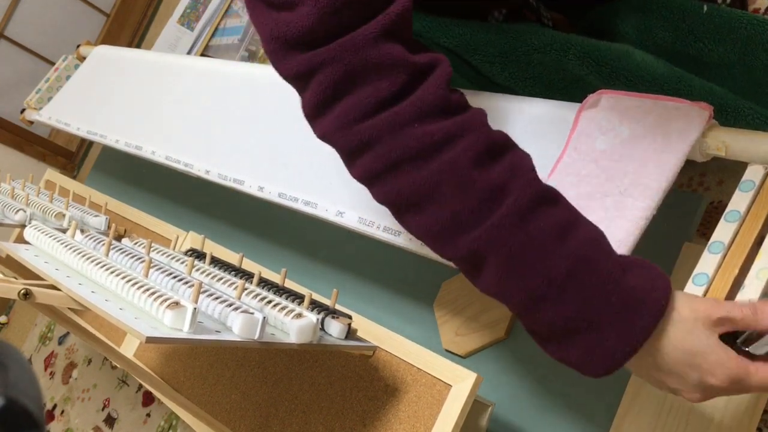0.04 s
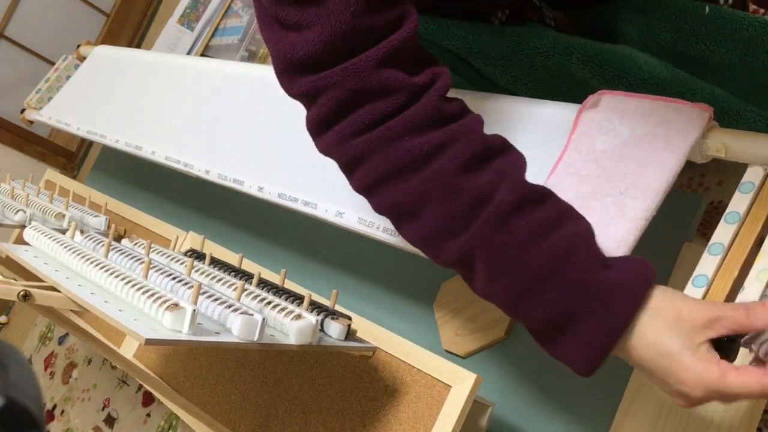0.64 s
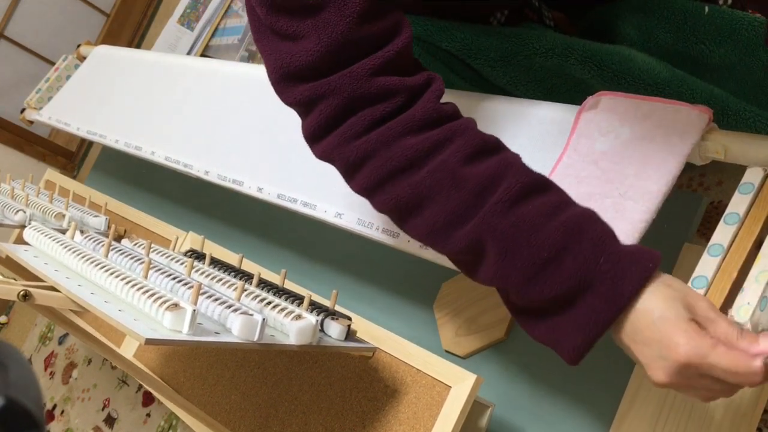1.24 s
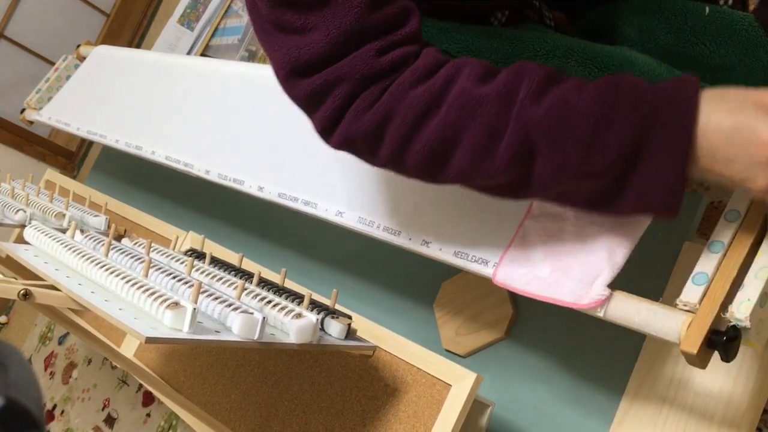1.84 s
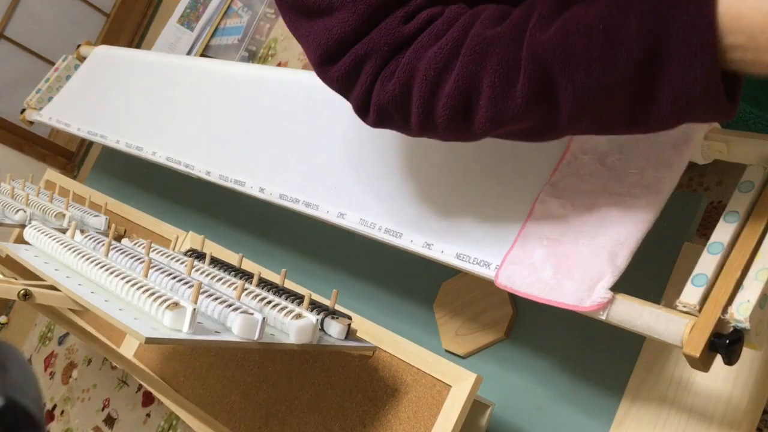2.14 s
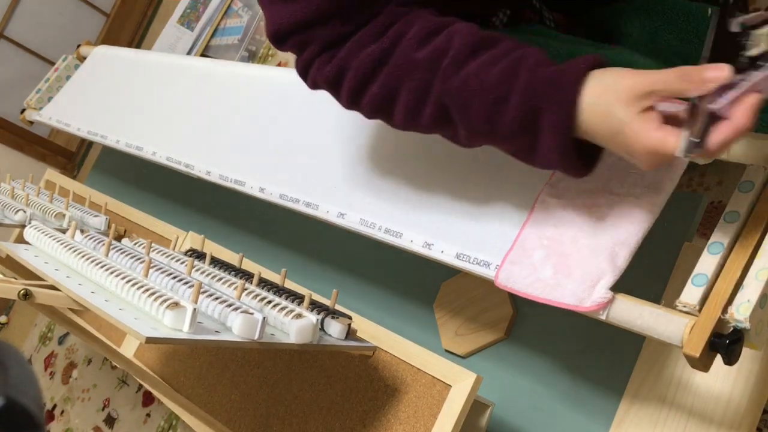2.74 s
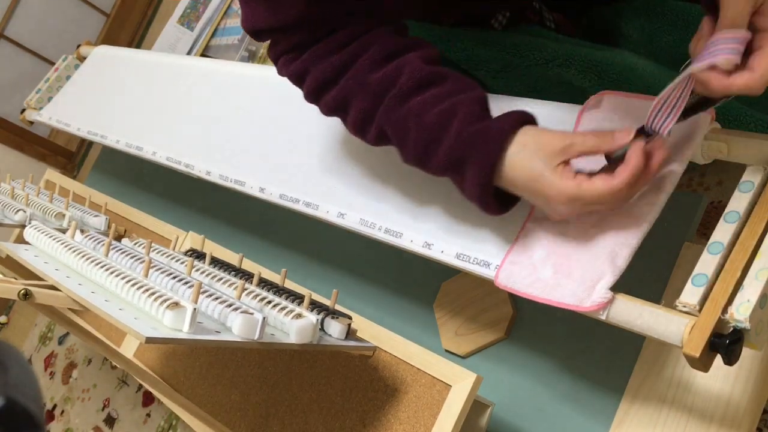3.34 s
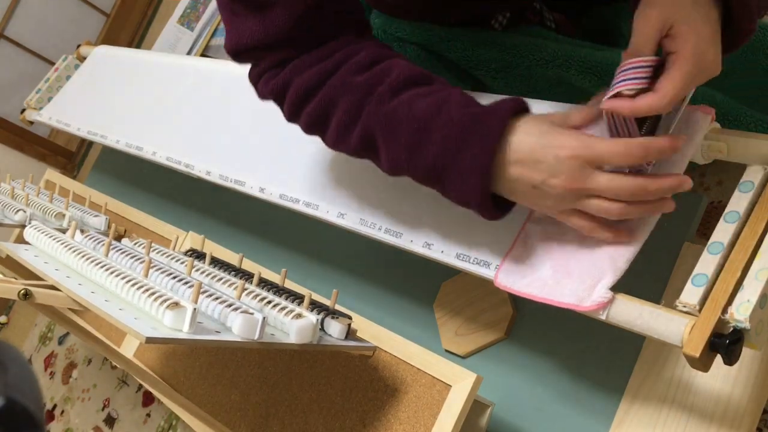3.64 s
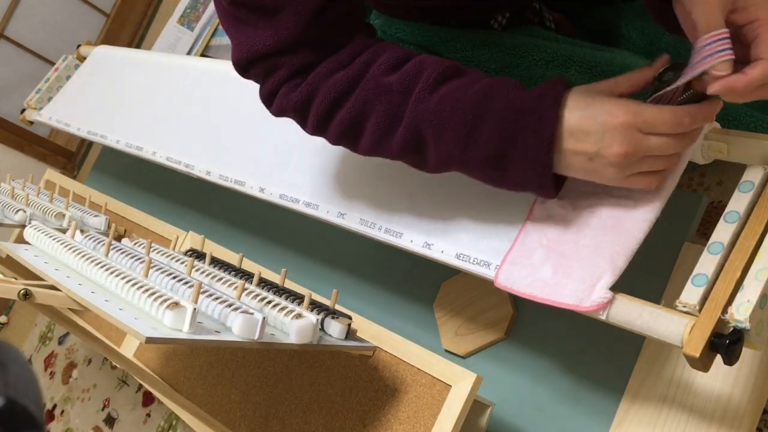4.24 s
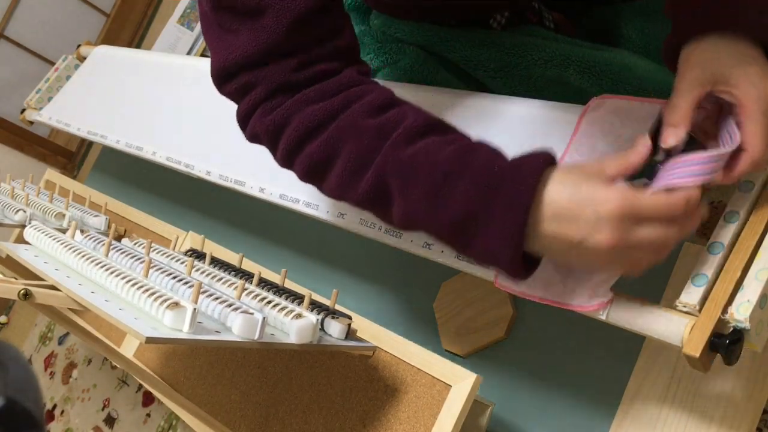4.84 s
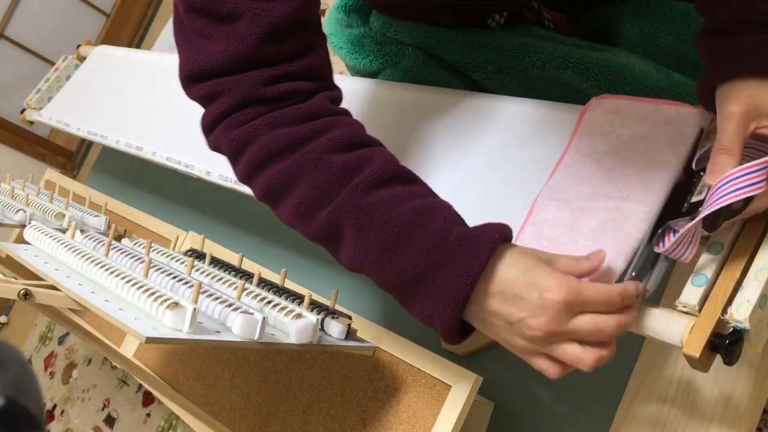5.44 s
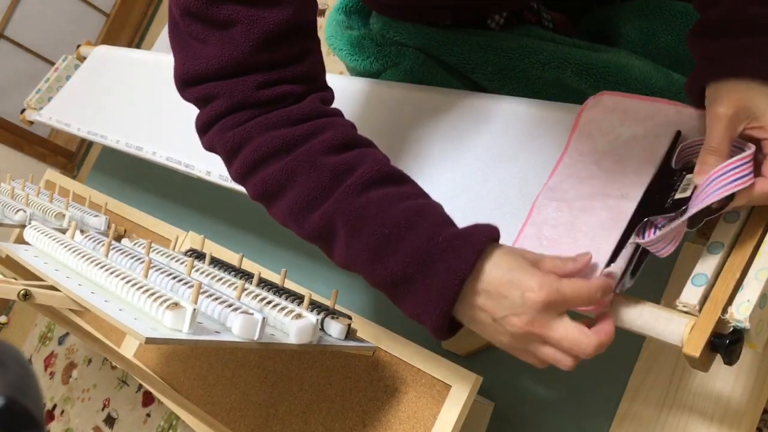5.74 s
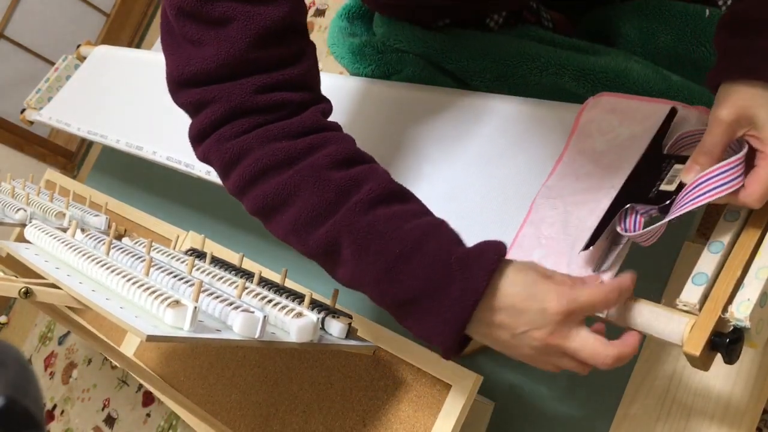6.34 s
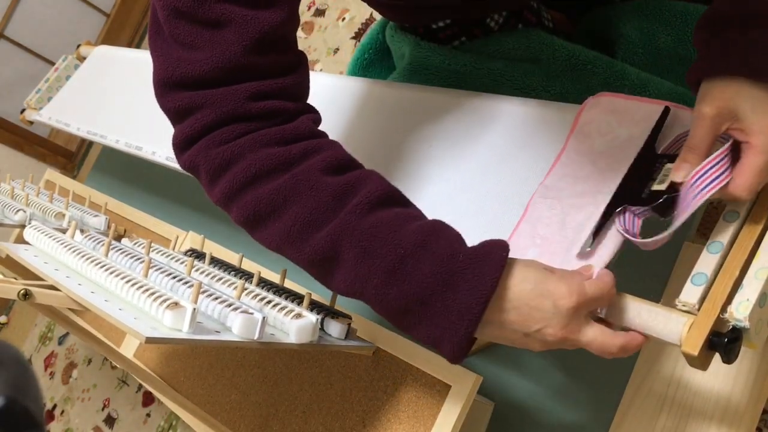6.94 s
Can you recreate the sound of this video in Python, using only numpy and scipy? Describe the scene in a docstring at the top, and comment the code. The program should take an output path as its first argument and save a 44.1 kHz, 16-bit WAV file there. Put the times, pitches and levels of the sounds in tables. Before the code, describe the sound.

Steel binder clips click, squeak and knock on a thudding wooden frame, then tick and scrape in the hands amid rustling sleeves.

```python
"""Binder clips on a wooden frame

A small room, one microphone. Large steel clips are pulled off a frame, handled and fitted on again.
They knock and squeak on the wood, the frame thuds and rumbles, and their wire handles tick and scrape.
Close to the microphone, fleece sleeves and cloth rustle; behind them lie room hiss and a faint hum."""
import sys
import numpy as np
from scipy import signal
from scipy.fft import rfft, irfft, next_fast_len
from scipy.io import wavfile
from scipy.ndimage import uniform_filter1d, map_coordinates

SR = 44100
rng = np.random.default_rng(int(sys.argv[2]) if len(sys.argv) > 2 else 0)


def int16_out(signal):
    """Quantize to a 16-bit WAV file."""
    q = np.round(np.clip(np.atleast_2d(signal).T, -1, 1) * 32767)
    wavfile.write(sys.argv[1], SR, q.astype(np.int16))


N = 317520
AGE = np.arange(SR * 3 // 10) / SR  # seconds since a blow
TOP_HZ = 16200
CONTACT_SPAN_S = 0.02  # a contact's level is set over this opening stretch

# Jolts to the frame; a hard one favours its light parts: start_s, level_db, hardness_db
JOLTS = [(0.001,-49,4.5), (0.29,-48.5,-5), (0.397,-47,-2.5), (0.575,-54.5,-7), (0.885,-70,-14),
         (1.17,-60.5,3.5), (1.346,-56.5,0.5), (1.459,-53.5,-3), (1.521,-66.5,-2), (1.968,-48.5,-9.5),
         (2.008,-49,-12), (5.44,-80,-21.5), (6.08,-68.5,-7), (6.3,-66.5,-8.5), (7.086,-69.5,-12)]
# Modes of a clip's steel spring: pitch_hz, level_db, t60_s
SPRING_MODES = [(1010, -9, 0.29), (1243, 5, 0.053), (1840, -4, 0.28), (2643, -10.5, 0.22), (2860, 1, 0.056),
                (3050, 0, 0.11), (4140, -5.5, 0.086), (4823, -13, 0.2), (5373, -42, 0.22),
                (8850, -15, 0.26), (11600, -10, .17), (11900, -13, 0.18), (14295, -12, 0.21)]
# A contact's four bands (wood, clack, bite, crack): low_hz, high_hz
CONTACT_BANDS = [(300, 900), (900, 1900), (1900, 4200), (4600, 20000)]


def amp(db):
    """Decibels to gain."""
    return 10 ** (np.asarray(db) / 20)


def unit(x):
    """Scale to rms 1."""
    return x / np.sqrt(np.mean(x ** 2) + 1e-20)


def unit_start(x, span_s=CONTACT_SPAN_S):
    """Scale so that the first span_s seconds have rms 1."""
    return x / np.sqrt(np.mean(x[:int(span_s * SR)] ** 2) + 1e-20)


def fade(t, t60):
    """Exponential decay, 60 dB down after t60 seconds."""
    return np.exp(-np.log(1000) * t / np.maximum(t60, 1e-3))


def along(points, hz):
    """Interpolate (Hz, value) points on a log frequency axis."""
    points_hz, values = np.transpose(points)
    return np.interp(np.log(hz + 1), np.log(points_hz + 1), values)


def wobble(rate):
    """A smooth random curve, rate knots a second."""
    knots = rng.standard_normal(int(N * rate / SR) + 4)
    coarse = np.linspace(0, N, num=N // 32)
    return np.interp(np.arange(N), coarse, map_coordinates(knots, [coarse * rate / SR]))


def filtered(x, response):
    """Filter x by a gain that is a function of frequency."""
    size = next_fast_len(len(x) + SR // 4)
    return irfft(rfft(x, size) * response(np.fft.rfftfreq(size, 1 / SR)), size)[:len(x)]


def coloured(x, spectrum):
    """x shaped by (Hz, dB) points, at rms 1."""
    return unit(filtered(x, lambda hz: amp(along(spectrum, hz))))


def add(track, start_s, sound):
    """Mix a sound into the track."""
    start = max(0, round(start_s * SR))
    track[start:start + len(sound)] += sound[:max(0, N - start)]


def ringing(modes, scatter_db, detune=0):
    """Damped modes, struck at new strengths each time; detune is the grip shifting their pitch."""
    hz, db, t60 = np.transpose(modes)[:, :, None]
    strength = amp(db + scatter_db * rng.standard_normal(hz.shape))
    hz = hz * (1 + detune * rng.standard_normal(hz.shape))
    phase = 2 * np.pi * (hz * AGE + rng.random(hz.shape))
    return np.sum(strength * fade(AGE, t60) * np.sin(phase), 0)


def in_room(x, wet_db, build_s=0.0074):
    """The direct sound and the small room's answer, whose treble dies first."""
    # Reverberation time: frequency_hz, t60_s
    room_decay = [(200, 0.32), (1300, 0.4), (3500, 0.25), (9000, 0.22), (15000, 0.12)]
    hz, t, noise = signal.stft(rng.standard_normal(len(AGE)), SR, nperseg=256)
    decaying = noise * fade(t, along(room_decay, hz)[:, None])
    tail = signal.istft(decaying, SR, nperseg=256)[1][:len(AGE)]
    tail *= 1 - np.exp(-(AGE / build_s) ** 2)
    return x + amp(wet_db) * signal.fftconvolve(x, tail / np.linalg.norm(tail))[:len(x)]


def room_tone(hiss_db=-70, hum_db=-73, hum_hz=57.4):
    """The room's steady hiss and a faint mains hum."""
    # Spectrum of the hiss: frequency_hz, density_db
    hiss_spectrum = [(59,-17), (100,-2.5), (224,-6.5), (461,-11.5), (818,-16.5), (2580,-22), (4870,-24),
                     (9020,-22.5), (10500,-25.5), (12500,-19.5), (16000,-20.5)]
    hum = amp(hum_db) * unit(np.sin(2 * np.pi * hum_hz * np.arange(N) / SR))
    return hum + amp(hiss_db) * coloured(rng.standard_normal(N), hiss_spectrum)


def frame_rumble(shudder_db=-2, shudder_t60=0.55, rise_s=0.013):
    """The loose frame rumbles under the arms and shudders on after each jolt."""
    # Rumble from the weight of the arms: time_s, level_db
    leaning = [(0,-57.5), (2.2,-60), (2.4,-64.5), (3.37,-66.5), (3.65,-63.5), (4.25,-70), (4.7,-71.5),
               (5.35,-66.5), (5.73,-68.5), (6.9,-63.5), (7.2,-71)]
    # Spectrum of the rumble: frequency_hz, density_db
    rumble_spectrum = [(15, -61), (25, -33), (30, -4), (40, -10), (65, -0.5), (98, -3.5), (130, -11),
                       (214, -9.5), (253, -16), (349, -17), (418, -26.5), (700, -24.5), (910, -33.5),
                       (1540, -120)]
    power = amp(np.interp(np.arange(N) / SR, *np.transpose(leaning))) ** 2
    shudder = fade(AGE, shudder_t60) * (1 - np.exp(-AGE / rise_s))
    for start_s, level_db, _ in JOLTS:
        add(power, start_s, (amp(level_db + shudder_db) * shudder) ** 2)
    return np.sqrt(power) * coloured(rng.standard_normal(N), rumble_spectrum)


def hand_motion(rustle_floor_db=-76, scrape_floor_db=-83.5, rise_share=0.41, roundness=1.12):
    """Strength of rustle and scrape: strokes speed up and slow; a faint, steady hiss stays between."""
    # Strokes that drag cloth and slide steel: fastest_s, length_s, rustle_db, scrape_db
    strokes = [(0.005,0.22,-54.5,-61.5), (0.178,0.14,-62,-62), (0.337,0.27,-58.5,-58.5),
               (0.585,0.34,-63,-62.5), (0.816,0.22,-70.5,-68.5), (0.944,0.26,-60,-77), (1.078,0.12,-58,-65),
               (1.22,0.45,-57.5,-61.5), (1.435,0.1,-57,-59), (1.512,0.25,-58,-61.5),
               (1.775,0.87,-61.5,-67.5), (1.96,0.2,-55,-56), (2.183,0.23,-71,-62), (2.516,0.17,-67.5,-69.5),
               (2.639,0.12,-63.5,-79), (3.114,0.32,-63.5,-58.5), (3.286,0.17,-64.5,-71.5),
               (3.479,0.15,-66,-70.5), (3.607,0.13,-71,-80), (3.78,0.27,-68.5,-71.5),
               (3.968,0.17,-66.5,-70.5), (4.356,0.27,-71,-76.5), (4.476,0.09,-81,-69),
               (4.763,0.088,-71,-64.5), (5.263,0.11,-76,-88), (5.496,0.19,-70,-71), (5.737,0.21,-69.5,-91),
               (5.912,0.1,-64,-74), (6.023,0.34,-67,-80), (6.342,0.29,-66,-75), (6.557,0.46,-69.5,-87),
               (6.81,0.17,-69.5,-79), (6.877,0.12,-66.5,-79), (7.018,0.43,-68,-83)]
    t = np.arange(N) / SR
    power = np.outer(amp([rustle_floor_db, scrape_floor_db]) ** 2, np.ones(N))
    for fastest_s, length_s, *levels_db in strokes:
        start, end = fastest_s - rise_share * length_s, fastest_s + (1 - rise_share) * length_s
        during = (t > start) & (t < end)
        ramp = np.interp(t[during], [start, fastest_s, end], [0, 1, 0])
        speed = np.sin(np.pi / 2 * ramp) ** roundness
        power[:, during] += np.outer(amp(levels_db), speed) ** 2
    return np.sqrt(power)


def grains(spiky, clumping):
    """Friction: countless tiny catches that come in clumps."""
    catches = rng.standard_normal(N) * np.exp(spiky * rng.standard_normal(N))
    return catches * amp(clumping * (wobble(220) + 2.16 * wobble(35)))


def cloth_rustle(strength, gain_db=0.5):
    """Fibres catch and slip as the sleeves and the strap move close to the microphone."""
    # Spectrum of rubbing cloth: frequency_hz, density_db
    cloth_spectrum = [(120,-26), (260,-9), (450,-22), (900,-1), (1300,-0.5), (1900,-3.5), (2900,-2),
                      (5000,-7.5), (7300,-6.5), (8800,-3.5), (10400,-7), (12500,-1.5), (16000,-9.5)]
    return amp(gain_db) * strength * coloured(grains(spiky=0.64, clumping=0.63), cloth_spectrum)


def handle_scrape(sliding, shift_db=4.0, sharpness=1.8):
    """Rubbing steel stirs the handles' resonances, now one and now another as the contact point moves."""
    # Wire handle resonances, before sharpness narrows them: pitch_hz, width_hz, level_db
    wire_modes = [(1292, 61, -0.5), (1518, 170, -0.5), (1787, 21, 4.5), (1977, 135, -.5), (2398, 81, 4),
                  (2640, 160, 3), (3040, 105, 2.5), (3300, 17, -7), (4195, 290, -8), (7050, 550, -7.5),
                  (8900, 750, -11)]
    slips, sound = grains(spiky=0.67, clumping=-0.5), np.zeros(N)
    for hz, width_hz, db in wire_modes:
        mode = signal.lfilter(*signal.iirpeak(hz, sharpness * hz / width_hz, fs=SR), slips)
        sound += mode * amp(db + shift_db * wobble(28))
    return sliding * unit(sound)


def gripped_steel(peak_db, low_hz=1100, t60=0.031, count=60):
    """Impulse response of steel held in the fingers: many short modes, new with every grip."""
    t = AGE[:len(AGE) // 7]
    place, phase = rng.random((2, count, 1))
    hz = low_hz * (TOP_HZ / low_hz) ** (place ** 0.6)
    modes = np.sum(np.cos(2 * np.pi * (hz * t + phase)), 0) * fade(t, t60)
    unity_peak = 2 * np.log(1000) / (t60 * SR)
    return (t == 0) + amp(peak_db) * unity_peak * modes


def edge_crackle(sliding, gain_db=-6):
    """Sliding edges catch in tiny bright ticks."""
    # Spectrum of the ticks: frequency_hz, gain_db
    tick_spectrum = [(4500, -19), (7200, -20), (9000, 3), (10400, -15), (14000, -13)]
    ticks = signal.fftconvolve(grains(spiky=1.27, clumping=4.0), gripped_steel(peak_db=14))[:N]
    return amp(gain_db) * sliding * coloured(ticks, tick_spectrum)


def frame_thuds(hand_rests_s=2.066, damped_t60=0.3):
    """The jolted frame booms, its heavy parts starting slowest; a hand comes to rest and damps it."""
    # The frame's three families of modes, heavy to light: pitch_hz, level_db, t60_s
    sway = [(53, 3, 0.086), (66.2, -10, 0.37), (78.8, -4, 0.4), (94.3, -8, 0.23)]
    rails = [(122.5, -6.5, 0.22), (140.4, 2.5, 0.32), (177.5, -2.5, 0.3), (199.8, 7, 0.22),
             (221, -3.5, 0.46)]
    panels = [(290, 3, 0.13), (338, 4, 0.21), (371.5, 5.5, 0.19), (437, -10.5, 0.36), (496, -23, 0.34),
              (579, -4, 0.11), (715, -13, 0.24)]
    out = np.zeros(N)
    for start_s, level_db, hardness_db in JOLTS:
        under_hand_s = np.maximum(start_s + AGE - hand_rests_s, 0)
        damping = fade(under_hand_s, damped_t60) if start_s < hand_rests_s else 1
        families = [(sway, -1.5 - hardness_db, 0.025), (rails, 1, 0.008),
                    (panels, -1.5 + hardness_db, 0.003)]
        for modes, share_db, rise_s in families:
            swing = ringing(modes, scatter_db=4) * (1 - np.exp(-AGE / rise_s))
            add(out, start_s, amp(level_db + share_db) * damping * unit_start(swing, span_s=0.09))
    return out


def contact(bands_db, chatter_t60, ring_hz, ring_db, cycles, softness, pitched_db):
    """A fast-dying chatter of tiny impacts in the steel, and the cluster of modes the blow favours."""
    clumps = unit(uniform_filter1d(rng.standard_normal(len(AGE)), size=90))
    impacts = rng.standard_normal(len(AGE)) * amp(2 * clumps)
    attack = 1 - np.exp(-AGE / (softness * chatter_t60 ** 2))  # long, sliding contacts start softly
    chatter = impacts * attack * fade(AGE, chatter_t60)
    burst = signal.fftconvolve(chatter, gripped_steel(pitched_db))[:len(AGE)]
    click = np.zeros(len(AGE))
    for k, edges_hz in enumerate(CONTACT_BANDS):
        band = signal.sosfilt(signal.butter(2, edges_hz, "bandpass", fs=SR, output="sos"), burst)
        click += (-1) ** k * amp(bands_db[k]) * unit_start(band)  # alternate signs join the bands
    t60 = cycles / ring_hz  # high modes die sooner
    cluster = ringing([(ring_hz, 0, t60)], scatter_db=0)
    cluster += ringing([(ring_hz, -10, t60 / 2)] * 2, scatter_db=4, detune=0.063)
    return click + amp(ring_db) * unit_start(attack * cluster)


def spring_ring(level_db):
    """A clip's shaken spring rings in all its modes."""
    return amp(level_db) * unit_start(ringing(SPRING_MODES, scatter_db=1.5))


def clip_knocks(gain_db=-2.5, wood_share=0.67):
    """Steel hits wood and shakes the spring a little; a clip that swings free rings on fully."""
    # Clips hit the frame: start_s, wood_db, steel_db, crack_db, chatter_t60_s, ring_hz
    knocks = [(0.002,-44,-52,-47.5,0.084,2640), (0.285,-54,-56.5,-40.5,0.038,2690),
              (0.392,-43.5,-49.5,-34,0.031,3100), (0.571,-49,-46,-54.5,0.02,1187),
              (1.171,-57,-37.5,-49,0.015,2133), (1.174,-52,-37,-50,0.049,2440),
              (1.347,-48,-56.5,-50.5,.062,1227), (1.46,-58.5,-68,-75,0.12,1080),
              (1.518,-81,-50,-43.5,0.013,3180), (1.951,-63,-50,-46.5,0.085,2550),
              (1.965,-66,-46.5,-57,.008,4680), (1.989,-46.5,-90,-57,0.047,950),
              (2.144,-71,-60,-51.5,0.052,3030), (2.182,-73,-59.5,-51.5,0.044,1860),
              (5.1155,-63,-48,-37,0.0052,5420), (6.785,-68.5,-74,-76,0.13,890),
              (6.829,-75,-68.5,-78,0.011,2640)]
    # A clip comes free: start_s, level_db
    free_swings = [(0.392, -37)]
    out = np.zeros(N)
    for start_s, wood_db, steel_db, crack_db, chatter_t60, ring_hz in knocks:
        clack_db = steel_db + wood_share * (wood_db - steel_db)
        hit = contact([wood_db, clack_db - 1, steel_db - 1, crack_db], chatter_t60, ring_hz,
                      ring_db=steel_db - 4, cycles=120, softness=0.45, pitched_db=-5)
        add(out, start_s, in_room(hit, wet_db=-7.5) + spring_ring(crack_db - 19))
    for start_s, level_db in free_swings:
        add(out, start_s, spring_ring(level_db - 1))
    return amp(gain_db) * out


def jaw_squeaks(waver=0.04, upper_db=-10):
    """A jaw sticks and slips on the wood, singing briefly on three unsteady modes."""
    # Slips of a jaw: start_s, length_s, pitch_hz, level_db
    slips = [(0.044, 0.028, 2650, -45.5), (0.273, 0.017, 2740, -58), (0.37, 0.032, 2700, -41.5),
             (0.526, 0.12, 2695, -54), (1.849, 0.075, 3300, -57)]
    out = np.zeros(N)
    for start_s, length_s, pitch_hz, level_db in slips:
        drift = 1 + waver * unit(uniform_filter1d(rng.standard_normal(len(AGE)), size=60))
        phase = 2 * np.pi * np.cumsum(pitch_hz * drift) / SR
        tone = np.sin(phase) + amp(upper_db) * (np.sin(1.52 * phase) + 0.44 * np.sin(2.8 * phase))
        swell = np.sin(np.pi * np.minimum(AGE / length_s, 1))
        add(out, start_s, in_room(amp(level_db) * tone * swell, wet_db=-13))
    return out


def fall_db(hz, ring_hz, db_per_octave=9):
    """How much a click weakens away from its ring pitch."""
    return db_per_octave * np.abs(np.log2(hz / ring_hz))


def handle_clicks(gain_db=-1):
    """Steel touches steel in the hands: a brief, bright chatter, with spring modes near the ring pitch."""
    # Handles and jaws meet: start_s, chatter_db, crack_db, chatter_t60_s, ring_hz, ring_db
    touches = [(0.606,-51,-58,0.014,1150,-61), (0.653,-70,-58,.007,2450,-61),
               (0.681,-74,-53.5,0.012,2340,-66), (0.748,-66,-68,0.014,2500,-72),
               (1.276,-57,-60,0.024,2400,-67), (1.286,-60,-64,.014,2460,-61),
               (2.126,-66,-61,0.041,2620,-61), (2.467,-64,-59,0.011,1390,-62),
               (2.469,-65,-74,.04,2590,-61.5), (2.539,-61.5,-65,0.071,2520,-66),
               (2.585,-68,-78,.039,1494,-68), (2.657,-68,-63,.05,1790,-74), (2.954,-77,-67.5,0.12,8300,-64),
               (3.046,-58.5,-62.5,.016,1548,-60), (3.09,-74,-58.5,0.11,1546,-59.5),
               (3.131,-64,-57,.049,2560,-54.5), (3.204,-64,-63,0.043,1900,-65),
               (3.24,-68,-63,0.036,2640,-61.5), (3.695,-73,-71,.035,2640,-67),
               (4.175,-67,-65,0.044,2480,-72), (4.23,-77,-87,0.039,2430,-68),
               (4.39,-63.5,-76,0.015,3770,-74), (4.451,-59,-69.5,0.093,2090,-64.5),
               (4.587,-69,-76,.022,1477,-72), (4.747,-69,-81,0.059,2970,-63.5),
               (4.811,-65,-66.5,0.014,1453,-70), (5.08,-52.5,-60.5,0.0071,1244,-64),
               (5.174,-61,-78,0.044,1260,-59.5), (5.201,-57.5,-53.5,0.017,2830,-69),
               (5.388,-82,-67.5,0.082,7400,-71), (5.511,-74,-57,.05,7460,-63),
               (6.979,-60,-54,0.006,2110,-66), (7.01,-81,-64,.011,3000,-80),
               (7.082,-56.5,-65,.036,2340,-61)]
    out = np.zeros(N)
    centres_hz = np.sqrt(np.prod(CONTACT_BANDS[:-1], axis=1))
    for start_s, chatter_db, crack_db, chatter_t60, ring_hz, ring_db in touches:
        wood_db, clack_db, bite_db = chatter_db - 3 - fall_db(centres_hz, ring_hz)
        pitched_db = 10 - 0.5 * (crack_db + 65)  # a light touch tinkles, a hard snap is noisier
        click = contact([wood_db - 8, clack_db, bite_db, crack_db], chatter_t60, ring_hz, ring_db - 1,
                        cycles=174, softness=0.46, pitched_db=pitched_db)
        modes = [(hz, db - fall_db(hz, ring_hz), t60) for hz, db, t60 in SPRING_MODES]
        add(out, start_s, click + amp(chatter_db - 15) * ringing(modes, scatter_db=1))
    return amp(gain_db) * in_room(out, wet_db=-9.5)


def jaw_ring(start_s=5.202, gain_db=8.5):
    # Modes of the released jaw: pitch_hz, level_db, t60_s
    jaw_modes = [(1203, -59, 0.24), (1382, -71, 0.23), (1715, -69, 0.18), (7537, -70, 0.18)]
    out = np.zeros(N)
    add(out, start_s, amp(gain_db) * ringing(jaw_modes, scatter_db=1))
    return out


def scene():
    """Clips, frame, sleeves and room at one microphone."""
    rustling, sliding = hand_motion()
    contacts = clip_knocks() + handle_clicks() + jaw_ring() + frame_thuds()
    friction = jaw_squeaks() + cloth_rustle(rustling) + handle_scrape(sliding) + edge_crackle(sliding)
    return (contacts + friction + frame_rumble() + room_tone())[None]


def record(dry):
    """The recorder cuts the deepest bass and keeps nothing above its band limit."""
    low_cut = signal.butter(6, 39, "high", fs=SR, output="sos")
    x = signal.sosfilt(low_cut, dry[0])
    return filtered(x, lambda hz: 1 / np.sqrt(1 + (hz / TOP_HZ) ** 160))[None]


dry = scene()
out = record(dry)
int16_out(out)
```